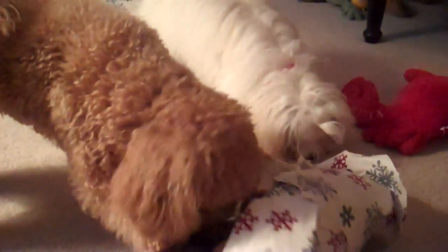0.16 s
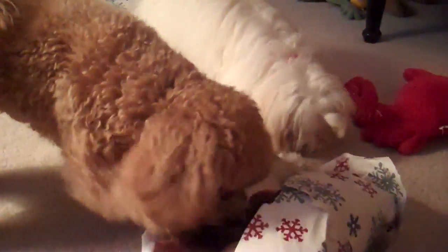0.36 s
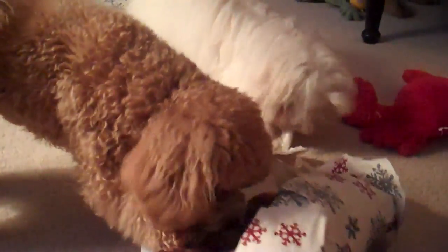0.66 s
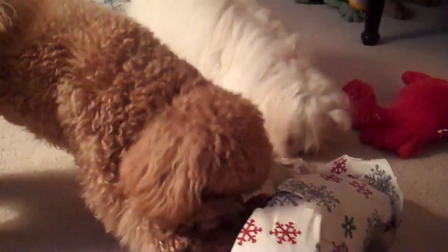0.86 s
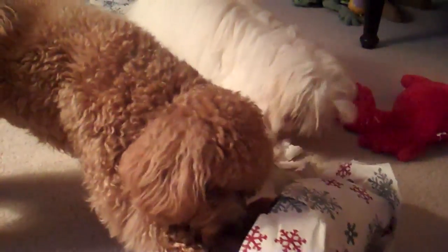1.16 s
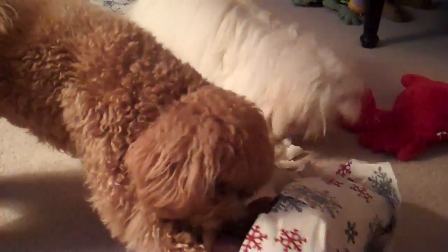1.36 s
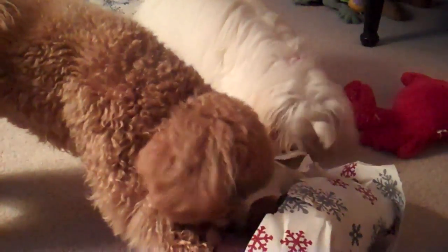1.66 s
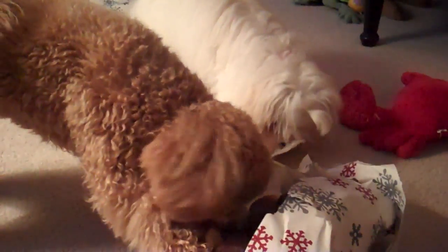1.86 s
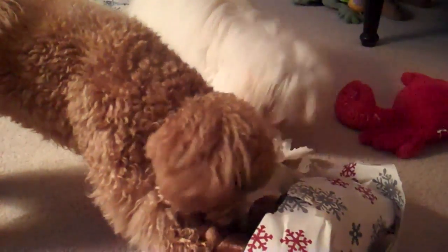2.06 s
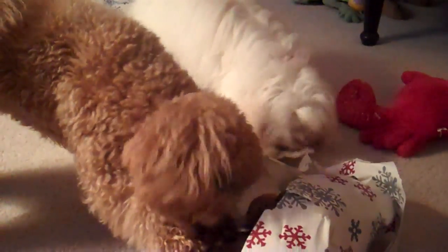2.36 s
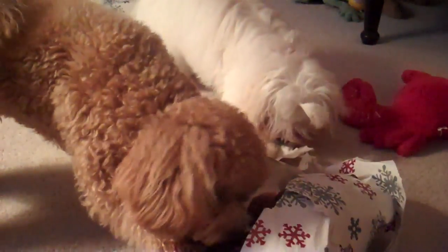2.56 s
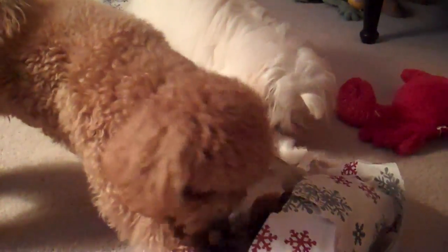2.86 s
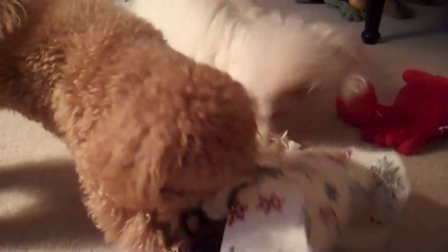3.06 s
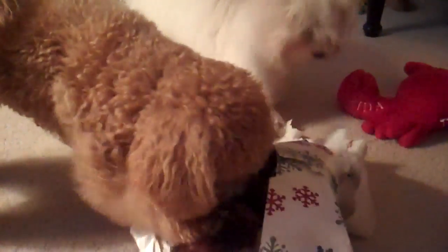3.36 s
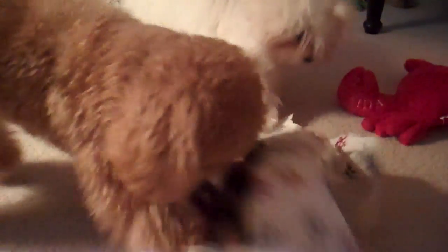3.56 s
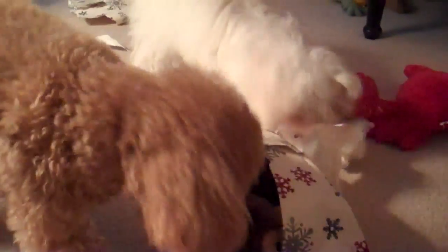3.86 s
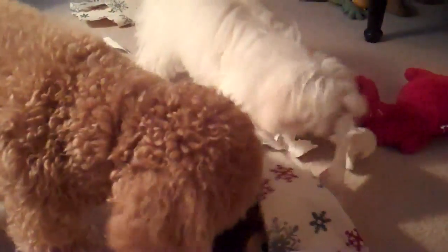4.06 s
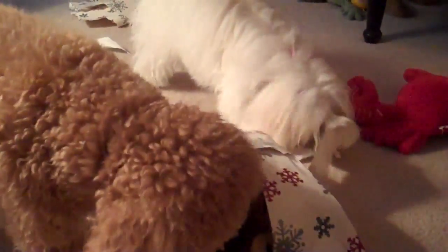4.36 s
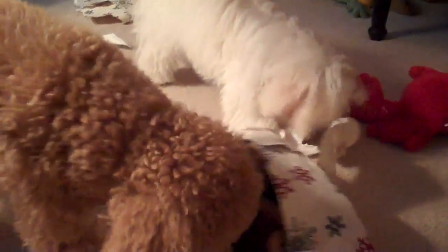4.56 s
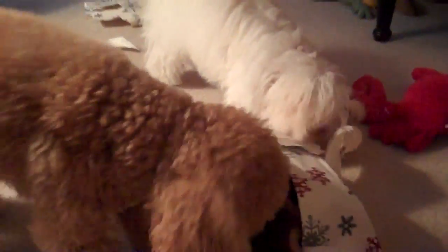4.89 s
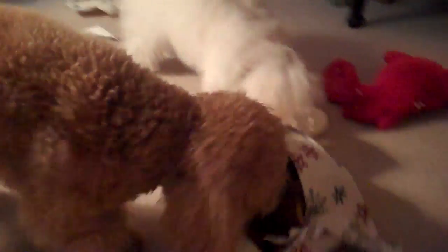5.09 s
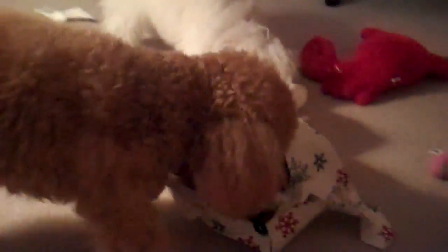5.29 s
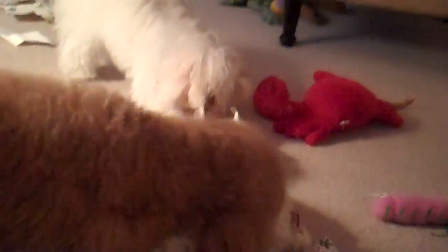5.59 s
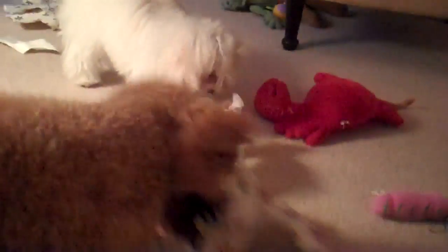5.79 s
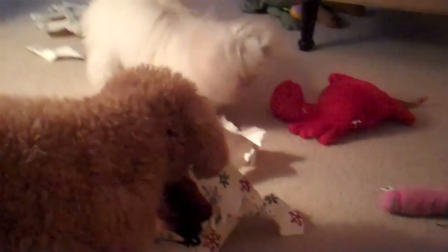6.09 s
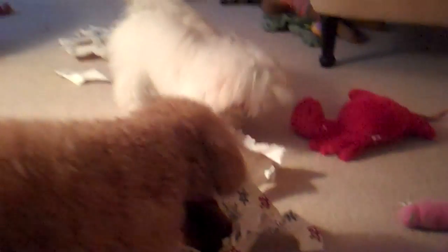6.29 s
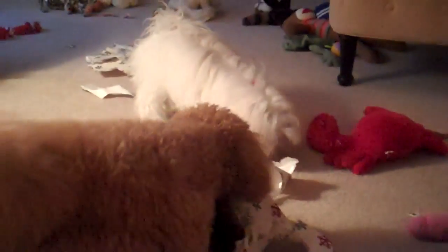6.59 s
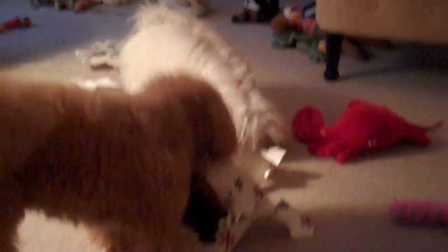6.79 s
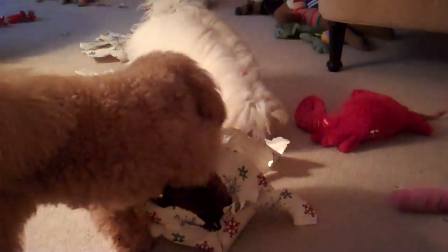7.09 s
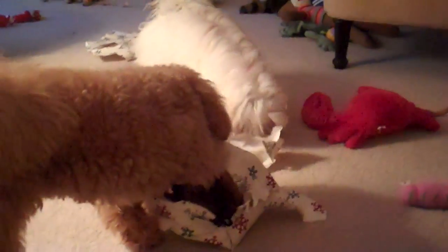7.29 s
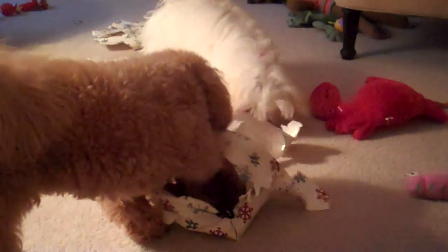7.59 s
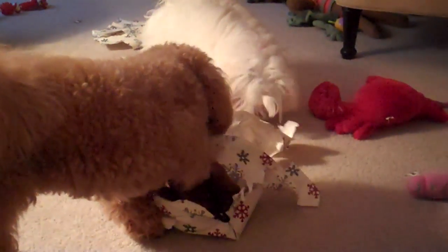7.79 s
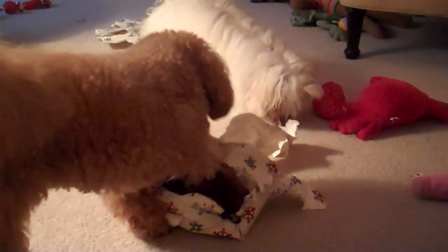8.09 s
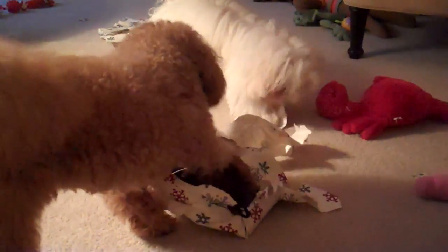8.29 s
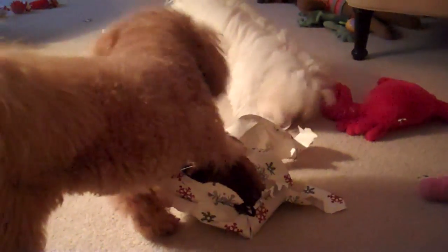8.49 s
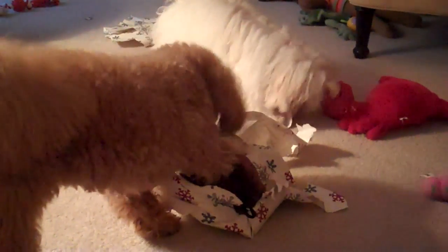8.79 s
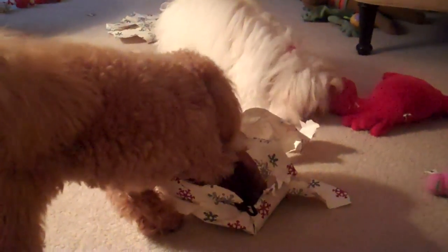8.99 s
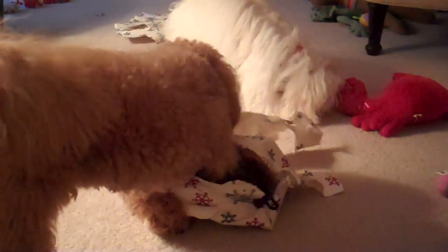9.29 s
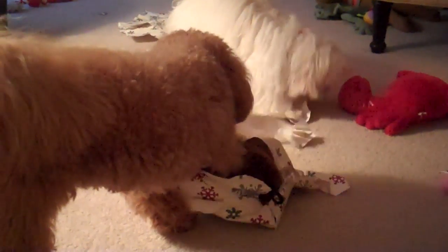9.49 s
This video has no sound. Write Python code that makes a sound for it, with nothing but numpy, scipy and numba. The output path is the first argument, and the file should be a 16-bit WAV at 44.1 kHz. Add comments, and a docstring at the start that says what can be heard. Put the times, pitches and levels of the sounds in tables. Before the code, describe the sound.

Two dogs pull stiff wrapping paper from a present on carpet. Sharp crease snaps and fine crackles come in uneven bursts, with brief fibrous rips and soft dull flaps between near-quiet gaps. A collar tag tinkles once, faintly, about a third of the way in. Handling gets busiest around eight seconds. A small stereo camera microphone a step away sounds bright and slightly hissy, in a short-tailed furnished room.

```python
"""A furnished, carpeted room: two dogs pull wrapping paper off a present, a step from a small camera.
Creases snap and crackle and fibres rip, all as short damped rings; the sheet flaps as filtered noise.
A collar tag tinkles once as one high mode. Decaying noise makes the short room tail, shaped noise the hush.
Each microphone port adds a resonance near 7 kHz."""
import sys
import numpy as np
from scipy import signal
from scipy.fft import rfft, irfft, next_fast_len
from scipy.io import wavfile
from scipy.ndimage import uniform_filter1d
from numba import njit

SR = 44100
rng = np.random.default_rng(int(sys.argv[2]) if len(sys.argv) > 2 else 0)


def master(y):
    """Save y as 16-bit WAV."""
    cut = np.clip(np.atleast_2d(y).T, -1, 1)
    pcm = np.round(cut * 32767)  # scale
    wavfile.write(sys.argv[1], SR, pcm.astype(np.int16))


N = 425565

# single creases buckling: onset t/s, level before the facet gains level/dB, own facet f/Hz
CREASE_SNAPS = [(0.1171, -34.5, 3030), (0.2192, -25, 3940), (0.3007, -33, 2230), (0.378, -37.5, 5890),
                (0.4289, -28.5, 2320), (0.4778, -23, 2810), (0.5254, -28, 5860), (0.5479, -22, 2350),
                (0.6394, -15, 6100), (0.7311, -11, 4640), (0.7682, -26.5, 4500), (0.9094, -26, 2190),
                (1.0697, -27, 2160), (1.1253, -21, 5260), (1.1558, -35, 5190), (1.352, -30, 2340),
                (1.388, -19.5, 2900), (1.432, -29.5, 2500), (1.6113, -16.5, 3260), (1.6623, -22.5, 2300),
                (1.71, -26, 3700), (1.808, -28, 3020), (1.8255, -15.5, 1980), (1.9292, -21.5, 2380),
                (2.0308, -24, 5100), (2.0469, -25, 3810), (2.0796, -6.5, 2420), (2.0903, -11, 2390),
                (2.101, -14.5, 2270), (2.1115, -30, 2310), (2.3965, -30, 5640), (2.4658, -26, 2810),
                (2.538, -27, 3350), (2.6043, -36, 6000), (2.614, -31, 2330), (2.6898, -26.5, 5600),
                (2.705, -24.5, 5000), (2.7765, -21.5, 4900), (2.816, -19.5, 4660), (2.833, -28.5, 1720),
                (2.8518, -18, 3900), (2.9489, -7.5, 3160), (2.9724, -27, 5200), (3.164, -19, 2400),
                (3.3635, -25, 5560), (3.688, -12.5, 5840), (3.7252, -16.5, 5800), (3.8044, -8.5, 6140),
                (3.8583, -20.5, 2270), (3.915, -27.5, 5830), (4.0949, -27, 5160), (4.1816, -20, 4500),
                (4.349, -22, 1440), (4.4782, -30, 3660), (4.7894, -30, 4940), (5.228, -21, 5000),
                (5.3547, -24, 1160), (5.5024, -19, 5670), (5.5455, -18, 1720), (5.588, -19, 5030),
                (5.812, -12, 2430), (6.3712, -32, 4380), (6.4603, -24.5, 1820), (6.6159, -22, 5600),
                (6.6767, -28, 4200), (6.693, -29, 5800), (6.7033, -23.5, 2300), (6.8353, -23, 1790),
                (7.228, -27, 1380), (7.2549, -26, 3200), (7.3652, -28.5, 1870), (7.3936, -18, 1930),
                (7.452, -25.5, 1940), (7.6488, -17.5, 1600), (7.708, -15, 2980), (7.8009, -8.5, 5960),
                (7.8516, -17, 2080), (7.878, -17, 2050), (8.0259, -15.5, 1510), (8.0501, -18, 2230),
                (8.1234, -17.5, 2630), (8.1648, -17, 5500), (8.212, -16, 1730), (8.2537, -8.5, 6200),
                (8.284, -24, 5530), (8.4262, -24, 3570), (8.5795, -21.5, 1500), (8.9265, -24, 4150),
                (9.0984, -20, 2090), (9.1618, -20.5, 1270), (9.2311, -21, 5440), (9.2763, -21.5, 2030)]


def undb(db):
    """Amplitude ratio from level: 20 dB per factor of ten."""
    return 10 ** (np.asarray(db) / 20)


def unit(x):
    """Normalisation to unit root-mean-square amplitude."""
    return x / np.sqrt(np.mean(x ** 2))


def band(x, lo_hz, hi_hz):
    """Band-pass filtering: only the components between two cutoffs pass freely."""
    return signal.sosfilt(signal.butter(2, [lo_hz, hi_hz], "band", fs=SR, output="sos"), x)


def on_log(hz, table):
    """Spectral interpolation: f/Hz, level/dB points joined by straight lines on a log-frequency axis."""
    f, db = np.transpose(table)
    return np.interp(np.log(hz), np.log(f), db)


def walk(rate_hz):
    """Random modulation: levels drawn at a given rate and slewed between, spread just under 1."""
    hold = int(SR / rate_hz)
    steps = np.repeat(rng.standard_normal(N // hold + 1), hold)
    return uniform_filter1d(steps, hold)[:N]


@njit
def rings(out, at, hz, cycles, size, lag, pan, rise):
    """Damped oscillation: each ring swells over `rise` cycles and decays to 1/e in `cycles`; left lags."""
    for g in range(len(at)):
        turn = np.exp((2j * np.pi - 1 / cycles[g]) * hz[g] / SR)  # phase and decay per sample
        relax = np.exp(-hz[g] / SR / rise)
        first = int(at[g])
        last = min(first + int(6 * cycles[g] * SR / hz[g]), out.shape[1])
        for c in range(2):
            age = 4 - (at[g] - first) - (lag[g] if c == 0 else 0.)  # keeps the fraction of a sample
            gain = pan[g] if c == 0 else 1 / pan[g]
            z = size[g] * gain * turn ** (age - 3)
            rest = relax ** (age - 3)
            for j in range(first, last):
                out[c, j] += z.imag * (1 - rest) * (j - first + age >= 3)
                z *= turn
                rest *= relax
    return out


def play(s, hz, cycles, size, place, rise_cycles=0.51):
    """Stereo localisation: place across the sheet (-1 to 1) sets delay and balance between the ports."""
    ones = np.ones(len(s))
    lag_samples = np.clip(2.2 + 1.1 * place, 0, 4)
    pan = undb(1.9 * place)
    hz = np.clip(hz, 50, 15000) * ones
    return rings(np.zeros((2, N)), s * SR, hz, cycles * ones, size * ones, lag_samples, pan, rise_cycles)


def snaps(count=14, settle_s=.0025, fade_db_per_s=700, scatter_db=8, after_db=-9):
    """Buckling instability: a crease gives way, its facets ring, and a quick run of weaker steps follows."""
    # what a snap rings besides its own facet: f/Hz, decay/cycles, level/dB
    common_facets = [(780, 0.98, -36), (5720, 0.72, -2.5), (9760, 0.84, -8)]
    own_cycles, own_db, own_db_per_octave = 0.75, -4, 1  # own facet, level at 2.5 kHz
    lead_s = 0.001106  # from the listed onset to the main step
    s, db, own_hz = np.transpose(CREASE_SNAPS)
    draw = rng.random((len(s), count, 7))

    # delay of each step after the main one
    late = settle_s * np.log(draw[..., 0] + 0.025) ** 2
    late[:, 0] = 0
    late[:, 1] = -2 * lead_s * draw[:, 1, 0]  # one weaker step falls up to about 2 ms before the main one
    fade_db = after_db - fade_db_per_s * late - scatter_db * (draw[..., 1] - .5)
    fade_db = fade_db * (late != 0)  # the main step keeps its full level
    place = np.repeat(2 * draw[:, 0, 2] - 1, count)
    start_s = (s[:, None] + lead_s + late).ravel()

    octaves = np.log2(own_hz / 2500)
    own = (own_hz[:, None], own_cycles, own_db + own_db_per_octave * octaves)
    hz, cycles, gain_db = common_facets[0]
    large = (hz, cycles, gain_db - 9 * octaves)  # bright snaps stir the large facet less
    out = 0
    for k, (hz, cycles, gain_db) in enumerate([own, large] + common_facets[1:]):
        # the main step rings its own facet exactly in tune
        spread_octaves = np.where(late == 0, .25 * (k > 0), .8)
        pitch = hz * 2 ** (spread_octaves * (draw[..., 3 + k] - .5))
        size = undb((db + gain_db)[:, None] + fade_db)
        out = out + play(start_s, pitch.ravel(), cycles, size.ravel(), place)
    return out


def crackle(per_s, spread_db, patchy_db, cycles):
    """Superposed random impulses: countless small creases, a few large among many small, in patches."""
    # relative grain size before the allowance for ring duration: f/Hz, level/dB
    grain_size = [(1000, -11.5), (2300, -2), (4500, -5.5), (7000, -7.5), (12000, -20)]
    when, pitch, rarity, length, across = rng.random((int(per_s * N / SR), 5)).T
    hz = 500 * (14000 / 500) ** (pitch ** 0.625)
    size = undb(on_log(hz, grain_size) - spread_db * np.log(rarity + 0.03))
    # a low ring lasts longer, so it starts smaller for the same energy
    size = size * np.sqrt(hz / 7000)
    grains = play(when * N / SR, hz, cycles * (1 + length), size, 2 * across - 1)
    return unit(grains * undb(patchy_db * (walk(75) + walk(170))))


def ripping(per_s=4000):
    """Fracture: fibres part along a tear in a dense hail of tiny bright ticks."""
    when, pitch, rarity, across = rng.random((int(per_s * N / SR), 4)).T
    size = undb(-4.0 * np.log(rarity + 0.041))
    return unit(play(when * N / SR, 3500 * 4.0 ** pitch, 0.41, size, 2 * across - 1))


def flapping(flap, work):
    """Bending and friction: the sheet rumples dully over carpet; harder tugs make the parcel thud more."""
    low = band(rng.standard_normal(N), 225, 1054) * undb(2.5 * walk(50))
    deep = band(rng.standard_normal(N), 79, 170) * undb(1.0 * walk(8.6))
    return flap * unit(low) + undb(-32.5) * work * unit(deep)


def handling():
    """Power addition of envelopes: tugs swell and die away, snaps settle, a faint stir never stops."""
    # a dog tugs the paper: peak t/s, crackle envelope level/dB, build-up and die-away in s per 10 dB,
    # flapping and ripping envelopes re crackle level/dB
    paper_tugs = [(0.0, -45, .05, 0.084, -14, 0), (0.543, -43.5, 0.13, 0.039, -17, 2),
                  (0.651, -34, 0.0097, 0.068, -37, 11.5), (1.13, -42, 0.17, 0.093, -26, 2.5),
                  (1.243, -39, 0.14, 0.012, -26, 10), (1.62, -48.5, 0.34, 0.12, -27, -8),
                  (2.1, -26, 0.013, 0.022, -18.5, 3.5), (2.55, -47, 0.14, 0.052, -44, 2.5),
                  (2.9, -40, 0.015, 0.043, -15, -18), (3.26, -42, 0.32, 0.15, -20, 3),
                  (3.698, -25, 0.015, 0.035, -21, -1), (3.808, -34, 0.13, 0.13, -12, -7.5),
                  (4.355, -38.5, 0.016, 0.036, -14, -22), (4.67, -49.5, 0.027, 0.26, -15, 4),
                  (4.9, -43.5, 0.17, 0.092, -14.5, 5.5), (5.15, -45, 0.25, 0.41, -13, 1),
                  (5.522, -33.5, 0.052, 0.063, -11, 0), (5.7, -53, 0.15, 0.2, 4, -15),
                  (5.819, -36, 0.11, 0.037, -19, 4), (6.02, -44, 0.37, 0.059, -12, 3.5),
                  (6.47, -50.5, 0.033, 0.21, -9.5, -17), (6.75, -44, 0.26, 0.19, -12, -6),
                  (7.481, -38, 0.081, 0.051, -10, -2), (7.71, -46.5, 0.089, 0.58, -9, -3.5),
                  (8.034, -26.5, 0.0079, 0.047, -12.5, 0.5), (8.232, -29, 0.12, 0.12, -16.5, 0.5),
                  (8.462, -36.5, 0.041, 0.017, -11, 3), (8.829, -49, 0.025, 0.84, -12.5, -3),
                  (9.29, -42, 0.027, 0.55, -18, -1), (9.46, -36, 0.087, 0.08, -7, 4.5),
                  (9.579, -38, 0.096, 0.046, -6.5, 10.5)]
    # after a snap the paper rustles on: level for a -19.5 dB snap, dB gained per dB of snap
    settle_db, settle_slope, settle_s_per_10db = -45.5, 0.8, 0.075
    settle_flap_db, settle_rip_db = -39, -18  # re crackle
    # noses and paws never quite leave the paper; flapping and ripping re crackle
    idle_db, idle_flap_db, idle_rip_db = -69, -7, 6.5

    s, db, _ = np.transpose(CREASE_SNAPS)
    ones = np.ones(len(s))
    settling = [s, settle_db + settle_slope * (db + 19.5), 0 * ones, settle_s_per_10db * ones,
                settle_flap_db * ones, settle_rip_db * ones]
    events = np.hstack([np.transpose(paper_tugs), settling])
    s, db, rise_s, fall_s, flap_db, rip_db = events[..., None]
    t = np.arange(0, N + 64, 64) / SR
    before = (s - t) / np.maximum(rise_s, 1e-3)
    after = (t - s) / np.maximum(fall_s, 1e-3)
    level_db = db - 10 * np.where(t < s, before, after)

    def envelope(extra_db, idle_extra_db):
        """Incoherent sources add in power, over an idle floor."""
        power = np.sum(undb(level_db + extra_db) ** 2, axis=0) + undb(idle_db + idle_extra_db) ** 2
        return np.interp(np.arange(N) / SR, t, np.sqrt(power))

    return envelope(0, 0), envelope(flap_db, idle_flap_db), envelope(rip_db, idle_rip_db)


def tag():
    """Modal vibration: one high mode of a small metal disc."""
    # collar tag touched: t/s, level/dB
    touches = [(3.252, -45)]
    tag_hz, t60_s = 10300, 0.08
    s, db = np.transpose(touches)
    return play(s, tag_hz, t60_s * tag_hz / np.log(1000), undb(db), 0 * s)


def room(x, count=6, stay_s=.12):
    """Reverberation: noise tails whose treble dies first, crossfaded in turn as dogs and paper move."""
    t60_s, treble_t60_s = 0.23, 0.16
    t = np.arange(int(.35 * SR)) / SR
    turn = np.arange(N) / SR / stay_s % count
    onset = np.clip(t / 0.00067 - 1, 0, 1)
    out = 0
    for k in range(count):
        shared, own = rng.standard_normal(len(t)), rng.standard_normal((2, len(t)))
        # the ports agree in the bass and differ in the treble
        low = band(shared + 0.064 * own, 65, 2440) * undb(-60 * t / t60_s)
        high = band(0.38 * shared + own, 2630, 22000) * undb(-60 * t / treble_t60_s)
        tail = (low + high) * onset
        tail = tail / np.sqrt(np.sum(tail ** 2) / 2)
        distance = np.abs((turn - k + count / 2) % count - count / 2)
        share = np.clip(1 - distance, 0, 1)
        out = out + signal.oaconvolve(x * np.sqrt(share), tail, axes=1)[:, :N]
    return out


def hush():
    """Stationary coloured noise: steady room air, mostly independent between the ports."""
    # relative spectral density of the air: f/Hz, level/dB
    air_spectrum = [(30, 9), (60, 12.5), (120, 13), (500, 11), (2000, 5), (6000, 1.5), (14000, -13)]
    noise = rng.standard_normal((2, N)) + 0.16 * rng.standard_normal(N)
    size = next_fast_len(N)
    hz = np.maximum(np.arange(size // 2 + 1) * SR / size, 10)
    spectrum = rfft(noise, size) * undb(on_log(hz, air_spectrum))
    return undb(-64) * unit(irfft(spectrum, size)[:, :N])


def scene():
    """Linear superposition: paper and tag, their room tail and the hush add."""
    work, flap, rip = handling()
    rustle = undb(-9.5) * crackle(per_s=3500, spread_db=0.5, patchy_db=3.5, cycles=1.3)
    folds = undb(-14.5) * crackle(per_s=300, spread_db=3.5, patchy_db=-0.5, cycles=0.85)
    fits = undb(2.5 * (walk(70) + walk(150)))  # a tear advances in fits and starts
    tearing = undb(-15.0) * rip * fits * ripping()
    creases = work * (rustle + folds) + tearing + snaps()
    # small creases radiate little bass
    creases = signal.sosfilt(signal.butter(2, 220, "high", fs=SR, output="sos"), creases)
    sources = creases + flapping(flap, work) + tag()
    return sources + undb(-8) * room(sources) + hush()


def boost(x, hz, width_hz, db):
    """Resonance: a peak stands above a flat response."""
    peak = signal.lfilter(*signal.iirpeak(hz, hz / width_hz, fs=SR), x)
    return x + (undb(db) - 1) * peak


def record(dry):
    """Cavity resonance at each port, right treble shaded; electronics hiss and round peaks."""
    # left and right port: resonance f/Hz, width/Hz, boost/dB, level/dB
    port_cavities = [(7490, 1050, 15, 4.5), (6780, 1510, 13, 3.5)]
    shade_hz, shade_db, hiss_db, top_hz = 8200, -14, -63.5, 14200
    out = np.array([undb(level_db) * boost(x, hz, width_hz, db)
                    for x, (hz, width_hz, db, level_db) in zip(dry, port_cavities)])
    dull = signal.sosfilt(signal.butter(2, shade_hz, fs=SR, output="sos"), out[1])
    out[1] = dull + undb(shade_db) * (out[1] - dull)
    out += undb(hiss_db) * rng.standard_normal((2, N))
    rounded = np.tanh(out)
    # almost nothing is heard above about 14 kHz
    return signal.sosfilt(signal.ellip(10, .3, 70, top_hz, fs=SR, output="sos"), rounded)


dry = scene()
out = record(dry)
master(out)
```